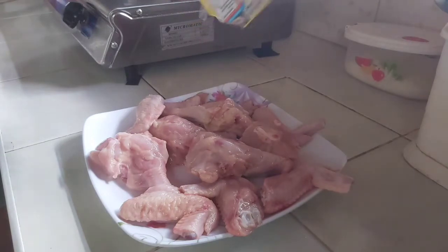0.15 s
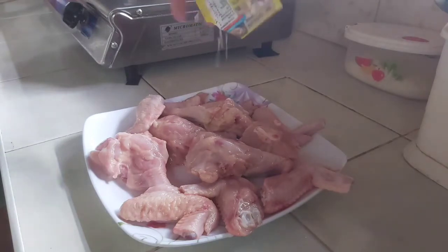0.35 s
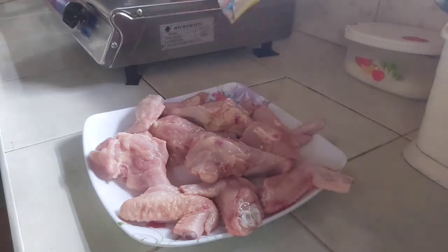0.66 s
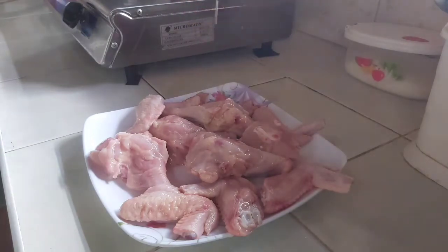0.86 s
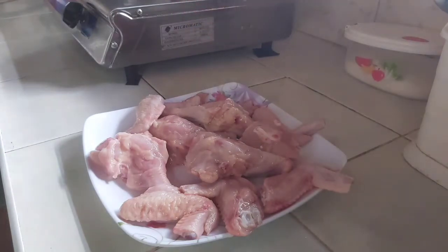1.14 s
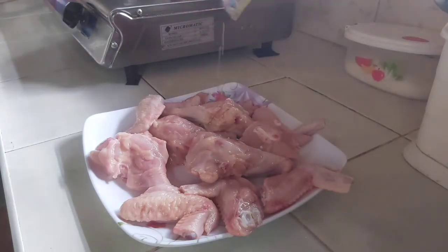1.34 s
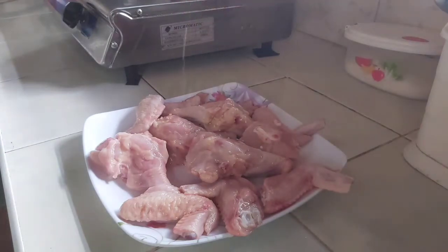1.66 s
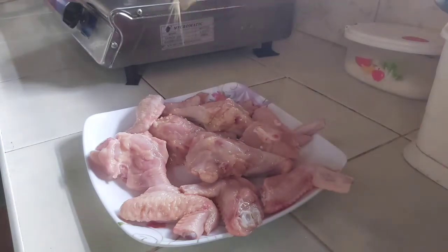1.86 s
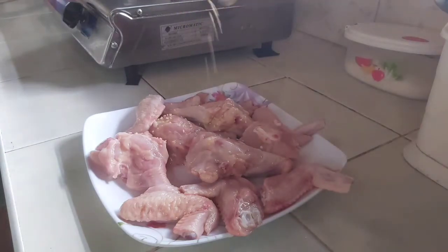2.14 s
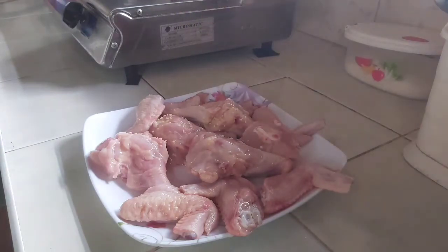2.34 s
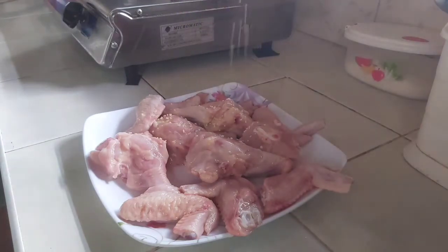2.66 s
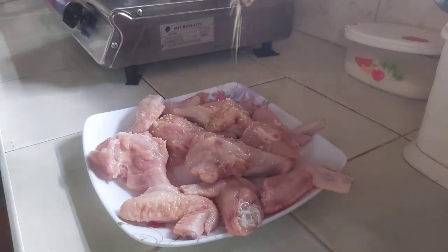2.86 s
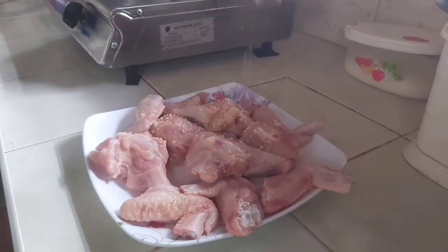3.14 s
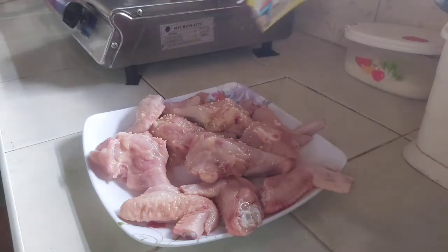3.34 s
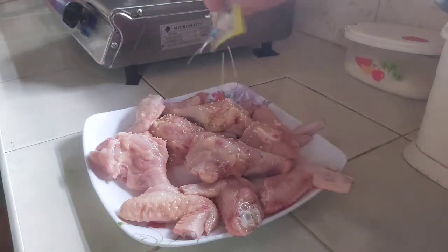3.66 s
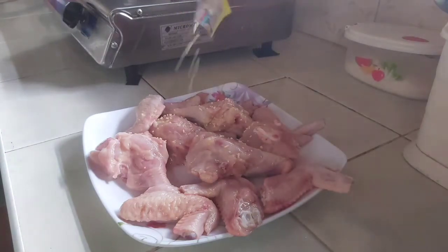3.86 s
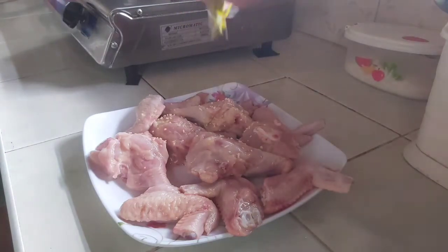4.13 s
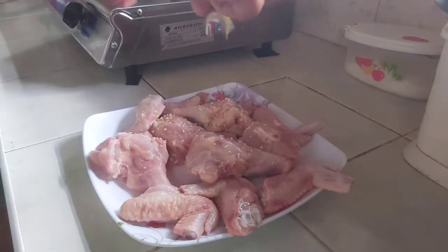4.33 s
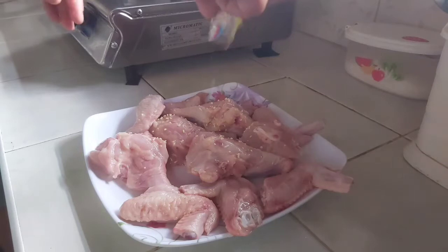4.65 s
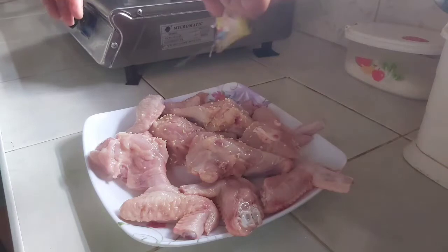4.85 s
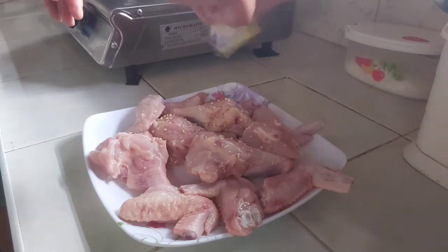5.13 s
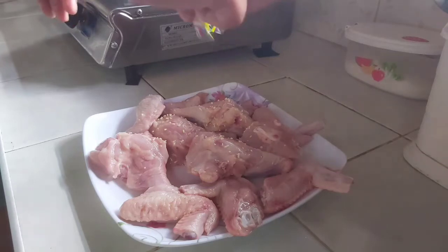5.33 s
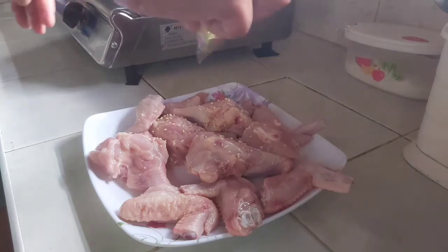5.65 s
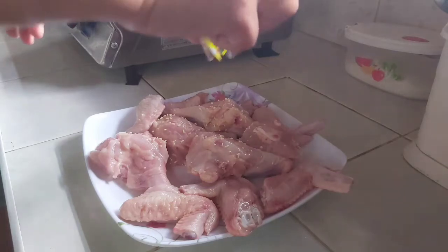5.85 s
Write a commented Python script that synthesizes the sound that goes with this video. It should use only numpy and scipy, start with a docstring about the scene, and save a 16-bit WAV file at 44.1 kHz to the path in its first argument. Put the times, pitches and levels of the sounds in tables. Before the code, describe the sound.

A small foil sachet of granules is shaken in short quick flicks, a crisp crinkling rattle that grows from faint to strong in a hard tiled kitchen.

```python
"""A small foil sachet of seasoning granules is shaken over a plate on a tiled kitchen counter.
First the fingers rub the sachet as the shaking starts softly, over a dull rustle and quiet room air that last throughout.
Each flick throws granules along the foil as a rattle of tiny ticks, creases snap with short noisy bursts,
and the walls flap softly at the start and end of the flick.
The shaking then grows stronger and steadier; the hard room rings with echoes of decaying noise."""
import sys
import numpy as np
from scipy import signal
from scipy.fft import rfft, irfft, next_fast_len
from scipy.io import wavfile
from scipy.ndimage import uniform_filter1d

SR = 44100
rng = np.random.default_rng(int(sys.argv[2]) if len(sys.argv) > 2 else 0)


def to_wav(s):
    """Save 16-bit WAV."""
    ch = np.atleast_2d(s).T  # columns
    pcm = np.round(np.clip(ch, -1, 1) * 32767)  # PCM
    wavfile.write(sys.argv[1], SR, pcm.astype(np.int16))


N = 263718

# flicks of the hand: (start [s], end [s], time to full speed [s], strength [dB],
# extra weight of the granules against the pouch wall [dB])
FLICKS = [(0.056, 0.13, 0.038, -53.5, -6), (0.139, 0.259, 0.0033, -65, 6), (0.323, 0.396, .01, -50, -6),
          (0.443, 0.51, 0.0032, -58, 1.5), (0.518, 0.609, 0.025, -50.5, -8),
          (0.622, 0.765, 0.0027, -59, -23), (0.951, 0.986, .013, -41.5, -1),
          (0.988, 1.05, 0.0037, -50.5, -9), (1.096, 1.203, 0.0055, -52.5, -12),
          (1.333, 1.378, 0.0082, -40.5, 2), (1.528, 1.639, 0.0043, -48.5, 0.5),
          (1.648, 1.698, .003, -45.5, -5), (1.87, 1.935, .03, -32, 0), (1.974, 2.101, 0.017, -42.5, 6),
          (2.246, 2.3, 0.0033, -54, -2), (2.31, 2.363, 0.0039, -43, -23), (2.365, 2.421, 0.0031, -34.5, -3),
          (2.426, 2.457, 0.00297, -45, 7), (2.501, 2.565, 0.02, -36, -1.5),
          (2.592, 2.674, 0.0077, -40.5, -7), (2.78, 2.843, 0.017, -32, 1),
          (2.92, 2.989, 0.0079, -37.5, -3.5), (3.019, 3.098, .003, -52, -4), (3.234, 3.296, 0.012, -32, 2),
          (3.395, 3.48, 0.057, -34.5, 1), (3.501, 3.564, .003, -45.5, -2), (3.669, 3.757, .014, -38.5, 0),
          (3.79, 3.929, 0.0026, -48.5, 10.5), (3.938, 3.994, .003, -39.5, -9),
          (3.995, 4.062, 0.00314, -35.5, -7.5), (4.176, 4.234, 0.021, -29, -2.5),
          (4.326, 4.437, 0.023, -34.5, -5), (4.526, 4.568, .012, -31.5, 0), (4.668, 4.752, 0.0056, -33, -1),
          (4.864, 4.893, 0.0029, -28.5, -2), (4.919, 4.963, 0.0036, -47, -5),
          (4.984, 5.054, 0.0039, -29, -1.5), (5.148, 5.184, 0.0037, -27, -1.5),
          (5.252, 5.342, .003, -32.5, 0.5), (5.411, 5.447, 0.0048, -26, -0.5),
          (5.53, 5.588, 0.019, -29.5, 1), (5.679, 5.731, 0.0027, -27.5, 3.5), (5.812, 5.894, 0.027, -33, 1)]
# large creases snapping over: (time [s], level [dB], pitch of the foil facet [Hz], brightness [dB])
SNAPS = [(0.175, -42, 6450, -14.5), (0.25, -55, 4500, -4), (0.386, -43.5, 3700, -14),
         (0.417, -40, 7900, -13), (0.5093, -46, 7250, -4), (0.538, -43.5, 5660, -7),
         (0.973, -39.5, 3880, 4), (1.0075, -36.5, 15000, 2), (1.0124, -35.5, 4360, -6),
         (1.0879, -41.5, 10700, -6), (1.1231, -31, 10700, 0.5), (1.1891, -42.5, 1840, 2),
         (1.204, -43.5, 5570, -5), (1.3346, -32.5, 5240, 1), (1.357, -38.5, 11700, 11),
         (1.53, -39, 4740, 1), (1.656, -34, 8600, 3), (1.718, -32.5, 5330, -4), (1.7761, -43.5, 10100, -1),
         (1.8838, -38, 9200, 9), (1.987, -34.5, 4930, 6), (2.0381, -33, 8450, -2), (2.0807, -31.5, 7000, 0),
         (2.0915, -36.5, 6900, 5), (2.209, -50, 6600, 3), (2.2514, -40.5, 3310, 0),
         (2.313, -39.5, 3900, -1), (2.3367, -32.5, 5540, -7), (2.387, -30, 5900, 7), (2.41, -36, 3400, 11),
         (2.5091, -41.5, 2170, -11), (2.555, -31.5, 6100, 0), (2.6263, -28.5, 5100, -2.5),
         (2.8387, -33.5, 4360, 14), (2.9394, -33, 5600, 6), (2.972, -37, 9400, 5), (2.9847, -38, 2170, -7),
         (3.033, -41.5, 5500, 2), (3.082, -42, 8000, -5), (3.1078, -29, 5500, -9), (3.133, -43, 4940, 17),
         (3.194, -39.5, 4030, -13), (3.2592, -31, 6400, 2), (3.2944, -30, 8600, 7), (3.393, -42, 3370, -24),
         (3.401, -38, 5200, 3), (3.42, -26, 7350, 0), (3.445, -31.5, 7000, -3), (3.4659, -26.5, 6400, 4),
         (3.5524, -35, 4470, 0), (3.7083, -31, 7700, -2), (3.727, -36, 5500, 17), (3.7992, -30.5, 4440, 5),
         (3.888, -35, 5930, -5), (3.943, -34, 4670, 7), (3.972, -34, 6500, 3), (3.9949, -27.5, 3750, -3),
         (4.0149, -26, 7300, -5), (4.0624, -32.5, 4460, 2), (4.203, -31.5, 4700, -2),
         (4.346, -36.5, 5900, 7), (4.382, -34, 6500, 6), (4.4149, -26, 6500, 4), (4.4454, -31.5, 4200, -10),
         (4.531, -34.5, 4800, -10), (4.541, -27, 5270, 2), (4.6048, -36, 6440, -4), (4.723, -29, 4320, 0),
         (4.738, -28.5, 6350, 1), (4.874, -28, 11300, -6.5), (4.9272, -34, 10100, -9),
         (4.962, -44, 7060, -9), (4.9875, -34, 6600, -3), (5.001, -25.5, 4700, 9), (5.041, -29, 10600, -1),
         (5.135, -41.5, 2380, -16), (5.1558, -26.5, 6000, 6), (5.1762, -31, 5000, -12),
         (5.2637, -31, 11500, 7), (5.3157, -29, 4500, 1), (5.531, -35, 9900, -6), (5.546, -29, 9600, 15),
         (5.572, -25, 6250, 2), (5.6857, -31.5, 4000, -4), (5.7233, -26.5, 7500, -3),
         (5.8382, -32.5, 4660, -4), (5.8454, -27.5, 9400, -1), (5.8863, -28, 6550, 1)]
# tone of the granules on foil, before brightening: (frequency [Hz], level per Hz [dB])
GRANULE_TONE = [(150, -32.5), (600, -7), (1100, -6.5), (1750, 1), (3000, 0), (4500, 0.5), (7000, -1.5),
                (11000, -6.5), (16000, -14.5)]
# tone of snapping foil, before its rings and brightening: (frequency [Hz], level per Hz [dB])
FOIL_TONE = [(150, -12.5), (500, -5), (1000, -6.5), (1700, 2.5), (3000, 0), (4500, 2), (7000, -0.5),
             (11000, -1), (16000, -4.5)]
# tone of the rumbling pouch: (frequency [Hz], level per Hz [dB])
POUCH_TONE = [(20, -15), (60, -10), (150, -10.5), (220, -13.5), (320, -4.5), (470, 0.5), (650, -14),
              (850, -3.5), (1500, -21), (4000, -45)]
# tone of a flapping wall, before tautness shifts its pitch: (frequency [Hz], level per Hz [dB])
FLAP_TONE = [(30, -24), (150, -8), (230, -10), (340, 5.5), (480, 3), (650, -8.5), (1000, -7), (3000, -32)]
# a soft, dull rub as the hand settles its grip: (time [s], level [dB])
RUB_LEVEL = [(0.03, -74), (0.065, -59), (0.09, -51.5), (0.115, -66), (0.15, -73), (0.2, -67), (0.26, -85)]
# tone of that rub: (frequency [Hz], level per Hz [dB])
RUB_TONE = [(60, -18), (220, -12), (300, 0.5), (450, 3), (540, -12), (620, -31), (1500, -47)]
# soft rustle of the pouch in the fingers, before a fixed trim: (time [s], level [dB])
GRIP_LEVEL = [(0, -65), (.5, -66.5), (.85, -73), (1.6, -64), (2.4, -64), (3.6, -66), (4.4, -60.5),
              (5.98, -59)]
# tone of that rustle: (frequency [Hz], level per Hz [dB])
GRIP_TONE = [(60, -15), (150, -8), (220, -10), (330, 0), (480, -4), (620, -11), (820, -6.5), (1300, -22),
             (4000, -26)]
# how fast the kitchen's ring dies: (frequency [Hz], time to fall 60 dB [s])
KITCHEN_DECAY = [(100, 0.9), (350, 0.27), (800, 0.36), (2000, 0.36), (5000, 0.33), (9000, 0.25),
                 (16000, 0.3)]
# a standing wave that outlasts its neighbours: (frequency [Hz], time to fall 60 dB [s], level [dB])
ROOM_MODE = (342, 0.44, -33)
# tone of the room air: (frequency [Hz], level per Hz [dB])
AIR_TONE = [(20, -23), (55, -25), (100, -5.5), (190, -14), (350, -8), (600, -19), (1200, -16), (2200, -14),
            (6000, -12), (16000, -33)]
# low hum in the room: (frequency [Hz], width [Hz], level [dB])
HUM = [(55, 9.1, -83), (95, 24, -71.5)]
# balance of the two microphones: (frequency [Hz], left minus right [dB])
BALANCE = [(100, 2), (500, 2.5), (1200, 3.5), (4000, 1), (8000, 1.7), (13000, -3.8)]
# how alike the two microphones sound: (frequency [Hz], likeness [0 to 1])
LIKENESS = [(35, 0), (65, 1), (130, 0.6), (280, 0.47), (550, 0.53), (1300, 0.043), (3000, 0.098),
            (16000, 0)]

# the harder the flick, the brighter the rattle and the more it stands above the thud of the pouch
HARD_FLICK_DB = -31
BRIGHT_DB, BRIGHT_DB_PER_DB = 2, 0.26
BODY_DB, BODY_DB_PER_DB, BODY_WEIGHT_SHARE = -50, 0.59, 0.51
# the wall flaps just after full speed; a hard flick pulls it tauter, so it sounds higher
FLAP_TAUT, FLAP_OCTAVES_PER_DB, FLAP_SCATTER_OCTAVES = 1.073, .007, 0.13
FLAP_DB, FLAP_DB_PER_DB, FLAP_LAG_S = -53, 0.8, .012
# as the hand stops, the wall flaps back, more softly
REBOUND_DB, REBOUND_LEAD_S = -3.5, .012
# small creases give way while the sachet moves
CRINKLES_PER_S, CRINKLE_DB, CRINKLE_DB_PER_DB, CRINKLE_SPREAD_DB = 26, -36.5, 0.85, 2
CRINKLE_HZ, CRINKLE_OCTAVES = 5500, 0.32
# a louder snap lasts longer and a brighter one rings the air in the pouch more
SNAP_DB, SNAP_LENGTH_S, SNAP_STRETCH_PER_DB = -33.5, .0013, .018
HOLLOW_DB, HOLLOW_SHARE, HOLLOW_SPREAD_DB = 1.5, 0.58, 5
EDGE_HZ = 16050  # upper edge of the sound


def flick(start, end, swell_s, db, weight_db):
    """One flick of the hand: its effort sets the rush of granules, the flaps of the wall and the crinkles."""
    effort_db = db - HARD_FLICK_DB
    bright_db = BRIGHT_DB + BRIGHT_DB_PER_DB * effort_db
    body_db = BODY_DB + BODY_DB_PER_DB * effort_db + BODY_WEIGHT_SHARE * weight_db
    yield rush(start, end, swell_s, db, bright_db, body_db)

    taut_octaves = FLAP_OCTAVES_PER_DB * effort_db + FLAP_SCATTER_OCTAVES * rng.standard_normal()
    taut = FLAP_TAUT * 2 ** taut_octaves
    flap_db = FLAP_DB + FLAP_DB_PER_DB * effort_db + weight_db
    yield flap(start + swell_s + FLAP_LAG_S, flap_db, taut)
    yield flap(end - REBOUND_LEAD_S, flap_db + REBOUND_DB, taut)

    yield from crinkles(start + swell_s, end, effort_db, bright_db)


def rush(start, end, swell_s, db, bright_db, body_db,
         settle_s=0.0065, slide_s=0.0073, slide_db=-11, trickle_db=-17, trickle_s=0.065,
         per_s=2600, crowding=.17, thinning=.55, hiss_db=-1.03):
    """Granules slide, gather speed, rattle along the foil and settle, a few trickling on; the pouch rumbles."""
    length = max(end - start, .005)
    swell_s = max(swell_s, .001)
    t = np.arange(-.04, length + .14, 1 / SR)
    after = np.maximum(t - length, 0)

    slide = gain_of(slide_db) * np.exp(np.minimum(t, 0) / slide_s)
    trickle = gain_of(trickle_db) * np.exp(-after / trickle_s)
    settle = np.maximum(np.exp(-after / settle_s), trickle)
    flow = np.maximum(slide, np.minimum(t / swell_s, 1)) * settle

    hits_per_s = per_s * gain_of(crowding * (db - HARD_FLICK_DB))  # a harder flick throws more granules
    crowd = np.maximum(flow, .03) ** thinning  # a thin flow breaks up into single ticks
    hits = granules(len(t), hits_per_s * crowd)
    rattle = evened(colour(hits, lambda hz: read(GRANULE_TONE, hz) + bright_db * treble(hz)))
    rattle = rattle * np.sqrt(crowd.mean() / crowd)  # sparse parts stay as loud, so flow sets the level
    body = evened(colour(rng.standard_normal((2, len(t))), lambda hz: read(POUCH_TONE, hz)))
    return start + t[0], flow * (gain_of(db + hiss_db) * rattle + gain_of(body_db) * body)


def granules(size, per_s, spread_db=3.0, clump_db=3.5, clump_s=.004, ring_s=0.0006, facet_db=7,
             uneven_db=2.5, low_hz=1600, high_hz=14000, count=10):
    """Uneven granules arrive in clumps and strike large and small foil facets, which bend anew with every shake."""
    clumps = evened(uniform_filter1d(rng.standard_normal(size), max(round(clump_s * SR), 1)))
    sizes_db = spread_db * np.minimum(rng.exponential(1, size), 3) + clump_db * np.clip(clumps, -2, 2)
    sizes = gain_of(sizes_db) * (rng.random(size) < per_s / SR)
    struck = rng.integers(0, count, size)  # which facet each granule strikes

    length = 2 * next_fast_len(size)
    hz = np.fft.rfftfreq(length, 1 / SR)
    sound = 0
    for k, pitch_hz in enumerate(np.geomspace(low_hz, high_hz, count)):
        peak_db = facet_db + uneven_db * rng.standard_normal()
        ring = gain_of(peak_db * facet(hz, pitch_hz))
        hits = rfft(sizes * (struck == k), length)
        sound = sound + hits * rfft(tick(ring_s), length) * ring
    return irfft(sound)[:, :size]


def tick(ring_s, onset_s=0.00039, size=512):
    """A struck foil facet: dense modes, made as noise that dies in milliseconds, different at each microphone."""
    t = np.arange(size) / SR
    return rng.standard_normal((2, size)) * np.exp(-t / ring_s) * (1 - np.exp(-t / onset_s))


def facet(hz, pitch_hz, octaves=0.18):
    """The broad resonance of one foil facet, 1 at its pitch."""
    return np.exp(-.5 * (np.log2((hz + 1) / pitch_hz) / octaves) ** 2)


def snap(s, db, pitch_hz, bright_db, facet_db=7, octaves=.35, hollow_hz=1400, onset_s=0.001, size=512):
    """A crease buckles in a quick run of tiny slips; the facet beside it and the air in the pouch ring."""
    length_s = SNAP_LENGTH_S * np.exp(SNAP_STRETCH_PER_DB * (db - SNAP_DB))
    hollow_db = HOLLOW_DB + HOLLOW_SHARE * bright_db + HOLLOW_SPREAD_DB * rng.standard_normal()

    def shape(hz):
        ring_db = facet_db * facet(hz, pitch_hz, octaves) + hollow_db * facet(hz, hollow_hz, 0.6)
        return read(FOIL_TONE, hz) + ring_db + bright_db * treble(hz)

    t = np.arange(size) / SR
    fade = 1 + (t / (1.74 * max(length_s, .0004))) ** 3
    run = (1 - np.exp(-t / onset_s)) / fade
    return s, gain_of(db) * evened(colour(rng.standard_normal((2, size)) * run, shape))


def crinkles(start, end, effort_db, bright_db, count=6):
    """Of a few small creases, some give way at random moments of the flick."""
    draws = np.hstack([rng.random((count, 2)), rng.standard_normal((count, 2))])
    for chance, moment, size, pitch in draws:
        db = CRINKLE_DB + CRINKLE_DB_PER_DB * effort_db + CRINKLE_SPREAD_DB * size
        pitch_hz = CRINKLE_HZ * 2 ** (CRINKLE_OCTAVES * pitch)
        sound = snap(start + moment * (end - start), db, pitch_hz, bright_db)
        if chance < CRINKLES_PER_S * (end - start) / count:
            yield sound


def flap(s, db, taut, rise_s=0.0041, size=4096):
    """The pouch wall flexes and gives a short papery thud."""
    u = np.arange(size) / SR / max(rise_s, .001)
    push = rng.standard_normal((2, size)) * u * np.exp(-u)
    return s, gain_of(db) * evened(colour(push, lambda hz: read(FLAP_TONE, hz / taut)))


def rub():
    """Fingers drag briefly on the filled sachet, heard as dull friction noise."""
    s, db = np.transpose(RUB_LEVEL)
    t = np.arange(s[0], s[-1], 1 / SR)
    friction = evened(colour(rng.standard_normal((2, len(t))), lambda hz: read(RUB_TONE, hz)))
    return s[0], gain_of(np.interp(t, s, db)) * friction


def handling(rustle_db=-4.0):
    """The fingers keep working the pouch, also between flicks: a soft, dull rustle of shaped noise."""
    s, db = np.transpose(GRIP_LEVEL)
    rustle = evened(colour(rng.standard_normal((2, N)), lambda hz: read(GRIP_TONE, hz)))
    return gain_of(np.interp(np.arange(N) / SR, s, db) + rustle_db) * rustle


def kitchen(x, sweep_s=1.5):
    """The hand wanders over the plate, so the pattern of echoes drifts between two places."""
    angle = np.pi * np.arange(N) / SR / sweep_s
    wet = 0
    for share in (np.cos(angle), np.sin(angle)):
        wet = wet + signal.oaconvolve(x * share, echoes(), axes=1)[:, :N]
    return x + wet


def echoes(early_db=-9, early_s=0.0038, tail_db=-6.5, build_s=0.0015, size=32768):
    """Counter and stove throw sound straight back; the tiled room then rings, each band at its own speed."""
    t = np.arange(size) / SR
    taps = rng.standard_normal((2, size)) * (rng.random((2, size)) < 5000 / SR)  # sparse reflections
    early = taps * (t > .001) * np.exp(-t / early_s)

    hz, frame_s, z = signal.stft(rng.standard_normal((2, size)), SR, nperseg=256)
    z = z * gain_of(-60 * frame_s / read(KITCHEN_DECAY, hz)[:, None])
    tail = signal.istft(z, SR)[1][:, :size] * (1 - np.exp(-t / build_s))

    mode_hz, t60, mode_db = ROOM_MODE
    mode = np.sin(2 * np.pi * (mode_hz * t + rng.random())) * np.exp(-np.log(1000) * t / t60)
    parts = (early_db, early), (tail_db, tail), (mode_db, mode)
    return sum(gain_of(db) * evened(part) for db, part in parts) / np.sqrt(size)


def ambience(floor_db=-70):
    """Quiet room air as shaped noise, with a low hum that wavers because it is narrow bands of noise."""
    hz = np.fft.rfftfreq(N, 1 / SR)

    def noise(gain):
        return evened(irfft(rfft(rng.standard_normal((2, N))) * gain, N))

    hum = sum(gain_of(db) * noise(1 / (1 + (2 * (hz - f) / width) ** 2)) for f, width, db in HUM)
    return gain_of(floor_db) * noise(gain_of(read(AIR_TONE, hz))) + hum


def microphones(x):
    """Two spaced microphones share more of the long waves and hear the short ones apart."""
    hz = np.fft.rfftfreq(N, 1 / SR)
    angle = np.arcsin(np.clip(read(LIKENESS, hz), -1, 1)) / 2
    z = rfft(x)
    z = np.cos(angle) * z + np.sin(angle) * z[::-1]  # blend each side with the other
    return irfft(z * gain_of(np.outer([.5, -.5], read(BALANCE, hz))), N)


def gain_of(db):
    """Decibels to a factor."""
    return 10 ** (np.asarray(db) / 20)


def evened(x):
    """Scales to an average (rms) strength of 1."""
    return x / np.sqrt(np.mean(x ** 2) + 1e-20)


def read(points, hz):
    """Joins (frequency [Hz], value) points on a log-frequency axis."""
    f, value = np.transpose(points)
    return np.interp(np.log(hz + 1), np.log(f + 1), value)


def treble(hz, corner_hz=7500):
    """Soft shelf: near 0 in the mids, near 1 in the top octave."""
    return 1 / (1 + (corner_hz / (hz + 1)) ** 4)


def colour(x, db_at):
    """Filters with the gain db_at(Hz), never ringing ahead of a sound, so that attacks stay sharp."""
    size = 2 * next_fast_len(x.shape[1] // 2 + 1024)
    log_gain = np.log(gain_of(db_at(np.fft.rfftfreq(size, 1 / SR))))
    # folding the cepstrum onto positive times gives the minimum-phase filter
    cepstrum = irfft(log_gain) * (1 + np.sign(size / 2 - np.arange(size)))
    cepstrum[0] /= 2
    return irfft(rfft(x, size) * np.exp(rfft(cepstrum)))[:, :x.shape[1]]


def add(mix, s, sound):
    """Mixes a stereo sound in at time s [s]."""
    part = mix[:, max(round(s * SR), 0):][:, :sound.shape[1]]
    part += sound[:, :part.shape[1]]


def scene():
    """The sachet's flicks, snaps, rustle and rub in the kitchen."""
    sachet = handling()
    for row in SNAPS:
        add(sachet, *snap(*row))
    for row in FLICKS:
        for s, sound in flick(*row):
            add(sachet, s, sound)
    add(sachet, *rub())
    return microphones(kitchen(sachet) + ambience())


def record(dry):
    """Band limit: a steep low-pass filter ends the sound just above 16 kHz."""
    low_pass = signal.firwin(511, EDGE_HZ, window=("kaiser", 9), fs=SR)
    return signal.oaconvolve(dry, low_pass[None], "same")


dry = scene()
out = record(dry)
to_wav(out)
```